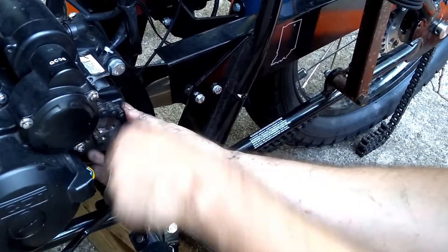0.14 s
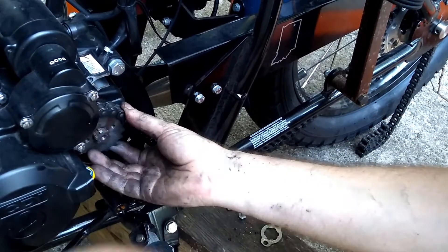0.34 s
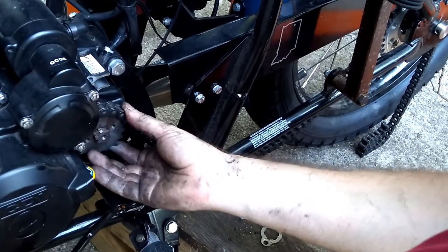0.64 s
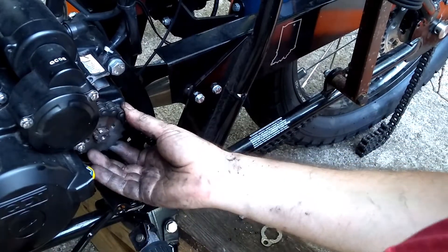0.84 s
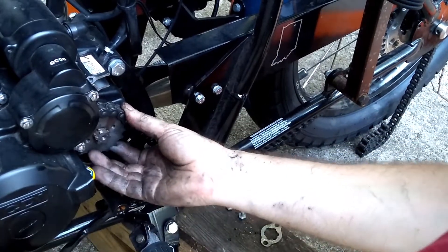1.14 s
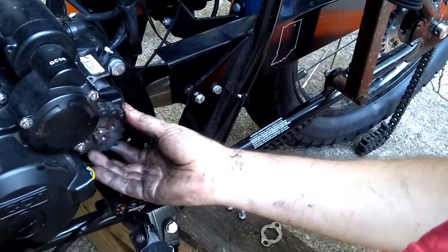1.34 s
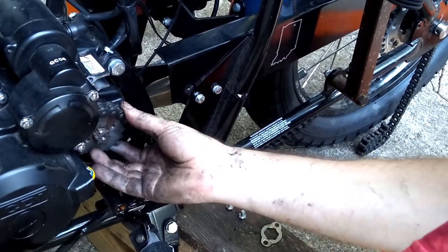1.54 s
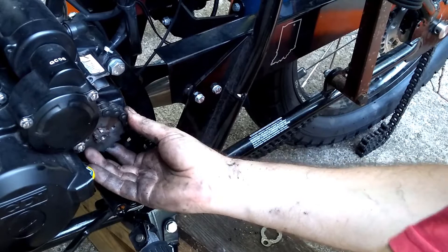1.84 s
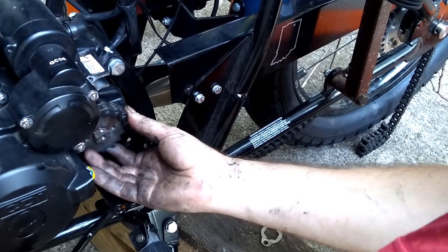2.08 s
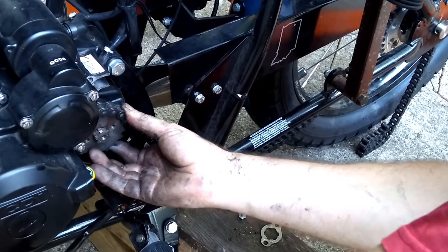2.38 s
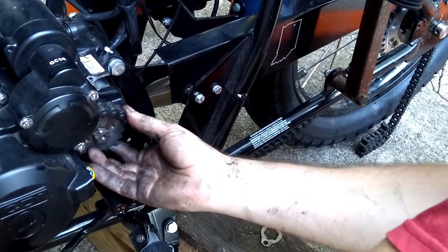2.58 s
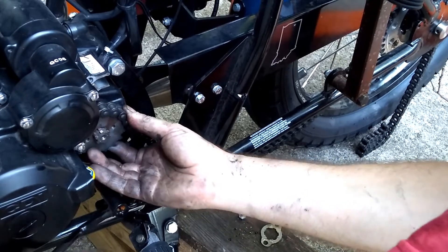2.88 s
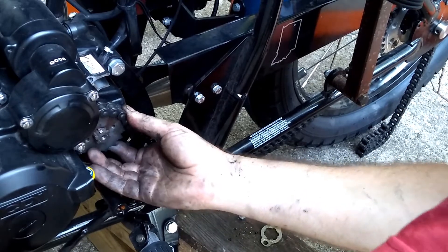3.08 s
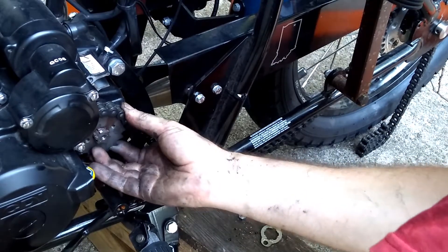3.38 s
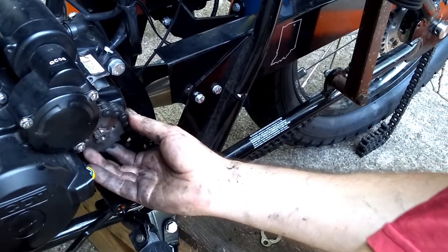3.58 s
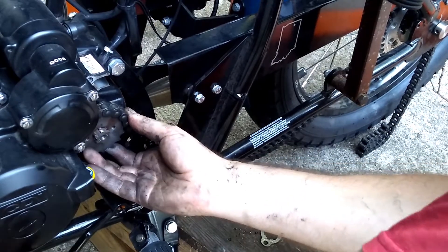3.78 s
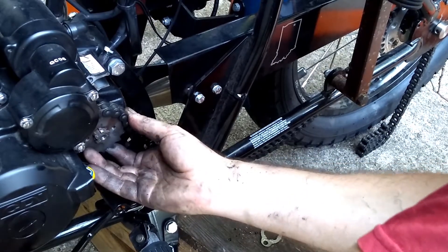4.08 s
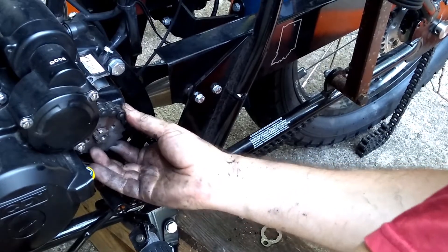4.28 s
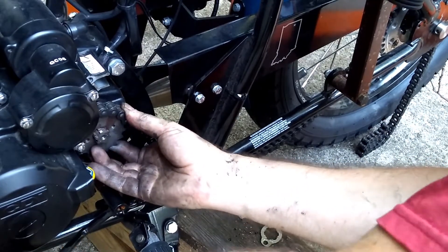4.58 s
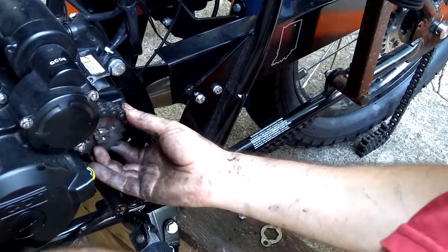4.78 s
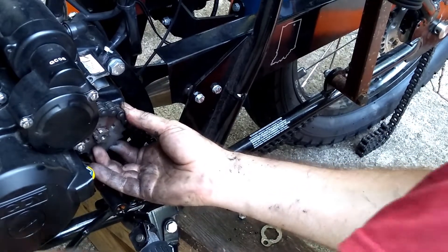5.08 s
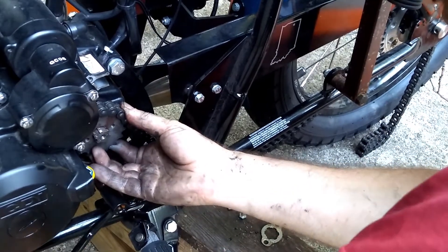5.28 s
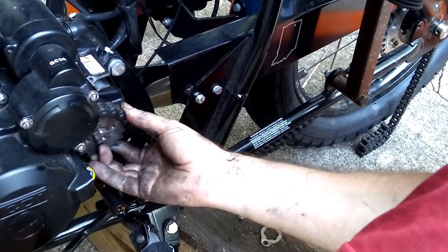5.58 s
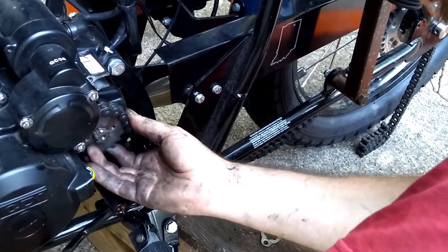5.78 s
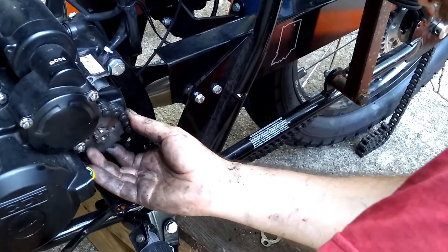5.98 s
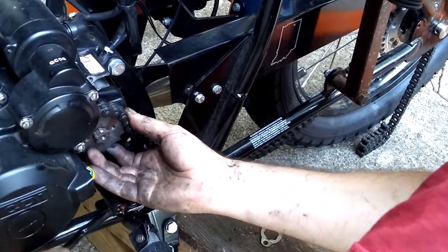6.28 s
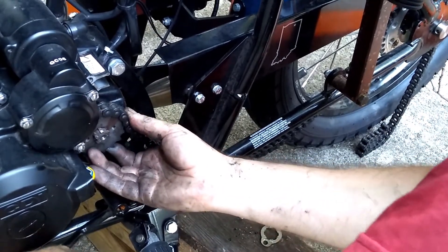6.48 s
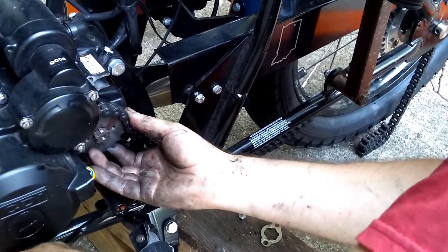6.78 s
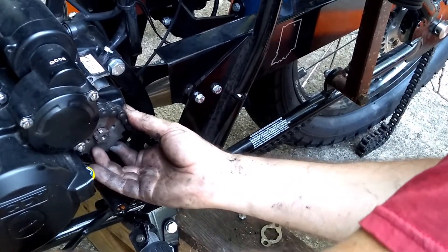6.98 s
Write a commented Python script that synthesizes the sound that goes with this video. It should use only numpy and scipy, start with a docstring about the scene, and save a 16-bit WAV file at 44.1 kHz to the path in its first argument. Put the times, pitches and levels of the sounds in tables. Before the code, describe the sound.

A metal drive chain is shifted by hand on its sprocket, close to the microphone in an open garage, in wide stereo. Its links click and rattle in short bursts, each with a thin steel ring and a brief echo. A light click comes at about 0.7 seconds, then a sharp cluster of clinks at 1.3, a smaller rattle at 2 and another strong one at 2.8. Lighter ticks follow between 3 and 4 seconds. The busiest stretch runs from 4.7 to 5.2 seconds, with three quick rattles, the last the loudest. After a few faint ticks, one more cluster lands around 6.6 seconds. Underneath, a distant motor hum and low rumble swell and drop out unevenly, steadier and a little stronger after 5 seconds. From about 0.7 seconds, crickets trill faintly outside over soft air noise.

```python
"""A drive chain, shifted by hand on its sprocket, close to a stereo microphone in an open garage.
Links click and rattle in short showers that ring the steel and knock the frame; the sprocket's rim
rings on and the walls answer briefly. In the distance a motor hums over a rumble; this low end rises
and drops out as the recorder's noise suppressor opens and closes. Outside, crickets trill with their
wings over faint air noise. The camera widens its stereo picture."""
import sys
import numpy as np
from scipy import signal
from scipy.fft import rfft, irfft, next_fast_len
from scipy.io import wavfile
from scipy.ndimage import uniform_filter1d

SR = 44100
rng = np.random.default_rng(int(sys.argv[2]) if len(sys.argv) > 2 else 0)


def persist_wave(psi):
    """Save psi, clipped to +-1, as 16-bit WAV."""
    counts = np.round(np.clip(psi, -1, 1) * 32767).astype(np.int16)
    wavfile.write(sys.argv[1], SR, np.atleast_2d(counts).T)


N = 314433

# chain blows: t/s, peak in the 2.4-5 kHz band/dB, rattle length/ms, then four tone gains:
# frame knock/dB, hollow/dB, sprocket clank/dB, bright tick/dB
CHAIN_BLOWS = [(0.665, -40.5, 2.9, -17.5, -24, -11, -20.5), (0.673, -46.5, 3.2, -21, -36, -1, -39),
               (0.9778, -57.5, 42, -33, -18, -4, -30), (1.064, -52.5, 2.4, 4.5, -9, -6, -9.5),
               (1.26, -34, 19.4, -31.5, -14.5, -5, -17), (1.2737, -38.5, 25, 1, -0.5, -5, -13),
               (1.289, -24, 1.9, -15.5, -13.5, -3.5, -11), (1.2992, -19, .8, -4.5, -8, 0.5, -16),
               (1.308, -33, 4.9, -0.5, -2.5, 6.5, -16), (1.3958, -42, 0.81, -12, -7, -14, -12),
               (1.625, -51, 7.8, -7.5, 7, -4, -7), (1.971, -31, 13.7, -13.5, -6, -12, -12),
               (2.0451, -38.5, 3, -21, -6, 5, -15), (2.314, -61.5, 25, -21, -31, -1.5, -9),
               (2.7958, -40, 22, -7.5, -11, -1, -16.5), (2.8321, -22, 3.2, 2, -2, 0, -17.5),
               (2.8458, -30, 12.7, 5, 4.5, 4.5, -9), (3.005, -53, 4.2, -39, -25, -23, -39),
               (3.0208, -43.5, 7, -21, -4, -25, -10), (3.1133, -48, 2.9, -11, 6, -2.5, -16.5),
               (3.526, -57, 3, -20, -17, -1, -27), (3.555, -34, 3.6, -11.5, -11, -3, -18.5),
               (3.695, -36, 4.4, -13, -21, -12, -17), (3.9613, -36, 4, -3, -14, -8, -20.5),
               (4.6629, -29, 16, -13, -10, -1.5, -11.5), (4.6842, -28, 2, -27, -8, -1.5, -9),
               (4.6901, -24, 4.7, -3.5, 0.5, -1.5, -10.5), (4.698, -39.5, 25.7, 4.5, 6, 4, -15),
               (4.865, -33.5, 4.4, -18.5, -15.5, -5.5, -24.5), (4.885, -34.5, 15, -9.5, -4.5, 2.5, -12),
               (4.909, -37, 11, -7, -7.5, 3, -7.5), (4.926, -35, 20, -0.5, -3.5, -1.5, -2),
               (4.9454, -48, 5, 7, -6, -1.5, -5), (5.166, -19.5, 8.4, -4, -3.5, -0.5, -16.5),
               (5.1793, -17, 1.7, -1, 7, 2.5, -15.5), (5.1916, -35, 4.1, 7, 9, 8, -21.5),
               (5.416, -53.5, 25, -24, -26, -4, -20), (5.516, -58, 6, 12.5, -12, -5, -26.5),
               (5.7591, -48, 23.6, -5, -21, -3, -27), (6.526, -62.5, 21, -12.5, -21, -20, -14),
               (6.5958, -44, 19, 5, 3, 5, -20), (6.6126, -28, 10.4, -3, -12, -0.5, -14),
               (6.627, -29.5, 9.8, -8, 0, 6, -9.5), (6.6748, -41, 2.8, -7, 1, -5, -17),
               (6.957, -55, 26, -14.5, -19, -15, -14.5)]
# where a blow's tone is set (knock, hollow, clank, two points at unity gain, tick): f/Hz
TONE_POINTS_HZ = [560, 950, 1500, 2500, 4200, 6200]
# modes of links, sprocket and frame, damped by grease and hand: f/Hz, level/dB, t60/s
STEEL_MODES = [(266, 10, 0.026), (491.6, -4.5, 0.062), (550.6, 0, 0.054), (731.7, -4, 0.034),
               (929, -5, 0.045), (1135, -11, 0.03), (1308, -8, 0.041), (1540, -4.5, 0.052),
               (1835, -3, 0.023), (2830, -6.5, 0.016), (2998, -0.5, 0.025), (3365, -5, 0.03),
               (3783, 0.5, 0.017), (6500, 11.5, 0.007), (8450, -2, 0.036)]
# resonance of the sprocket's free rim: f/Hz, level/dB, t60/s
RIM_MODES = [(3800, -8, .5)]
# reverberation of the garage: f/Hz, t60/s
GARAGE_DECAY = [(250, 0.42), (600, 0.3), (1400, 0.29), (3700, 0.27), (9000, 0.24)]
# upper hum harmonics as the noise suppressor lets them through, relative to the low end:
# t/s, third/dB, fourth/dB, fifth and sixth/dB
SUPPRESSED_HARMONICS = [(0.0, -4, -11.5, -35.5), (1.3, -24, -63, -45), (2.04, 0, -9, -19.5),
                        (2.45, -3.5, -17.5, -35), (2.8, 2.5, 8, -9), (3.28, -39.5, -31, -43),
                        (3.47, -12, -2, -22), (3.97, 0, 2, -17), (4.52, -13, -13.5, -41),
                        (5.22, -4, -3, -3.5), (5.7, -7.5, -9.5, -17.5), (6.0, -19, -38.5, -36),
                        (6.52, -18, -26, -63), (6.64, -4.5, -9, -32), (7.12, -8, -16.5, -38)]
# spectrum of the distant rumble: f/Hz, relative level/dB
RUMBLE_SPECTRUM = [(25, -35), (56, -34), (80, -9), (157, -7), (285, -22.5), (600, -46), (1300, -75.5)]
# level of the low end as the recorder's noise suppressor opens and closes: t/s, level/dB
SUPPRESSOR_LEVEL = [(0.0, -64.5), (0.44, -57), (0.72, -43.5), (1.14, -50), (1.33, -41.5), (1.5, -57),
                    (1.75, -53), (2.0, -50), (2.35, -52), (2.66, -58.5), (2.85, -48), (3.3, -54),
                    (3.95, -56.5), (4.08, -69.5), (4.33, -53), (4.47, -65.5), (4.7, -45.5), (5.2, -48.5),
                    (5.78, -41), (7.12, -44)]
# brief dropouts of the low end where the suppressor closes: t/s, depth/dB
SUPPRESSOR_DIPS = [(1.901, -12), (2.73, -15.5), (3.1, -12), (3.41, -10.5), (4.201, -19), (4.559, -8),
                   (4.821, -14), (5.108, -15)]
# crickets outside: t/s, near level/dB, far level/dB, top hiss level/dB
CRICKET_LEVELS = [(0, -107, -102, -100), (.5, -95, -86, -93), (.68, -69, -75.5, -77.5),
                  (2.4, -68.5, -76, -77.5), (2.7, -81, -75.5, -102), (4.5, -74, -77.5, -90.5),
                  (7.13, -72, -70.5, -92)]
# spectrum of the air around the microphone: f/Hz, relative level/dB
AIR_SPECTRUM = [(30, -19.5), (120, 3), (400, -3), (900, -10.5), (2000, -14.5), (4500, -16.5), (9000, -21),
                (16000, -28)]

CONTACTS_PER_S, UNEVEN_DB, FIRST_CONTACT_DB, FALL_DB_PER_MS = 4000, 3, 11.5, 1.14
CLATTER_UNITY_DB, CLATTER_DB_PER_DB = -45, 0.7032  # harder blows clatter more
JINGLE_DB, JINGLE_T60_S = -23, 0.2  # loose links shiver on after each blow
WANDER_RAD = 0.06  # per sample: rubbing links shake the phase of every mode
RIGHT_LAG_RAD = 1.204  # the right microphone hears the links a little behind
HUM_HZ, DIP_S = 79.7, 0.053
CROSS_DELAY_MS, BAND_LIMIT_HZ = 0.4417, 15700


def chain():
    """The hand shifts the chain blow by blow, close by and a little right of centre."""
    lead = 256  # samples of each blow ahead of its moment
    out = np.zeros((2, N + 20000))
    for at_s, peak_db, rattle_ms, *tone_db in CHAIN_BLOWS:
        sound = blow(peak_db, rattle_ms, *tone_db, lead=lead)
        start = round(at_s * SR) - lead
        out[:, start:start + sound.shape[1]] += sound
    return out[:, :N] * gain_of([[-1.2], [1.2]])


def blow(peak_db, rattle_ms, knock_db, hollow_db, clank_db, tick_db, lead):
    """One shower of link contacts rings the steel of chain, sprocket and frame."""
    size = 8192
    t, hz = np.arange(size) / SR, np.fft.rfftfreq(size, 1 / SR)
    shower = rfft(link_contacts(t, rattle_ms))
    steel = rfft(steel_ring(t, hz, shower) + clatter(t, peak_db))
    tone_db = [knock_db, hollow_db, clank_db, 0, 0, tick_db]
    tone = gain_of(at_frequency(list(zip(TONE_POINTS_HZ, tone_db)), hz))
    tone *= (hz / 220) ** 2 / (1 + (hz / 220) ** 2)  # small parts radiate no bass
    tone /= 1 + (hz / 8800) ** 5  # grease takes the top
    lag = np.exp(-1j * np.array([[0], [RIGHT_LAG_RAD]]))
    sound = np.roll(irfft(shower * lag * steel * tone), lead, axis=1)
    core = irfft(rfft(sound) * (hz > 2400) * (hz < 5000))
    core_peak = np.sqrt(2 * uniform_filter1d((core ** 2).mean(0), size=300).max())
    return sound / core_peak * gain_of(peak_db)


def link_contacts(t, rattle_ms):
    """Links strike at random and unequally for the length of the rattle, then die away."""
    size = len(t)
    contacts = rng.standard_normal((3, size)) * (rng.random(size) < CONTACTS_PER_S / SR)
    contacts *= gain_of(UNEVEN_DB * np.minimum(rng.exponential(1, size), 4))
    contacts = 1.2 * contacts[0] + 0.58 * contacts[1:]  # each microphone faces other sides of the links
    attack = np.minimum((t + 1 / SR) / 0.0013, 1)
    contacts *= attack * gain_of(-FALL_DB_PER_MS * np.maximum(1000 * t - rattle_ms, 0))
    contacts[:, 32] += gain_of(FIRST_CONTACT_DB)
    return contacts


def steel_ring(t, hz, shower):
    """The damped steel modes, their level and pitch a little different at every blow."""
    mode_hz, db, t60 = np.transpose(STEEL_MODES)[:, :, None]
    level_luck, pitch_luck = rng.standard_normal((2, len(STEEL_MODES), 1))
    mode_hz = mode_hz * (1 + 0.016 * pitch_luck)
    power = uniform_filter1d(abs(shower.sum(0)) ** 2, size=15)
    reach = np.sqrt(power.mean() / np.interp(mode_hz, hz, power))  # every shower reaches every mode
    wander = WANDER_RAD * np.cumsum(rng.standard_normal((len(STEEL_MODES), len(t))), 1)
    decay = gain_of(db + 2.5 * level_luck - 60 * t / t60)
    build = 1 - np.exp(-t * mode_hz)  # takes a few cycles, so the bass blooms late
    return (reach * build * decay * np.sin(2 * np.pi * mode_hz * t + wander)).sum(0)


def clatter(t, peak_db):
    """Small modes too close to tell apart: a bright burst with a faint jingling tail."""
    bright = signal.lfilter([1, -0.7], 1, rng.standard_normal(len(t)))
    decay = gain_of(-60 * t / 0.02) + gain_of(JINGLE_DB - 60 * t / JINGLE_T60_S)
    return bright * decay * gain_of(CLATTER_DB_PER_DB * (peak_db - CLATTER_UNITY_DB))


def sprocket_rim(links):
    """The free rim rings on thinly after each blow."""
    out = 0
    for hz, db, t60 in RIM_MODES:
        b, a = signal.iirpeak(hz, Q=hz * t60 * np.pi / np.log(1000), fs=SR)
        out = out + gain_of(db) * signal.lfilter(b, a, links)
    return out


def garage(links):
    """Wall reflections: three diffuse tails alternate, so no single pitch rings after every blow."""
    length, out = SR // 2, 0
    for k in range(3):
        taps = np.zeros((2, length))
        arrivals = np.arange(200, length - 20, 20)
        arrivals = arrivals + rng.integers(0, 20, (2, len(arrivals)))
        np.put_along_axis(taps, arrivals, rng.choice([-1., 1.], arrivals.shape), 1)
        hz, t, bands = signal.stft(taps, SR, nperseg=256)
        bands *= gain_of(-60 * t / at_frequency(GARAGE_DECAY, hz)[:, None])
        tail = signal.istft(bands, SR, nperseg=256)[1]
        turn = np.sqrt(2 / 3) * np.cos(2 * np.pi * (11 * np.arange(N) / SR + k / 3))
        out = out + signal.fftconvolve(links * turn, tail / np.linalg.norm(tail[0]), axes=1)[:, :N]
    return out


def motor_hum():
    """A distant, steady hum whose upper harmonics fade in and out under the noise suppression."""
    turns = np.cumsum(HUM_HZ * (1 + 0.002 * drift(hz=13))) / SR
    third, fourth, fifth = gain_curves(SUPPRESSED_HARMONICS)
    levels = [gain_of(-14), gain_of(-2.5), third, fourth, fifth, gain_of(-6.5) * fifth]
    lags_rad = [1.8, 0.36, 1.8, 1.2, 0.87, 0.88]  # between the microphones
    hum = 0
    for k, (level, lag) in enumerate(zip(levels, lags_rad)):
        waver = gain_of((0.2 + 1.1 * k) * drift(hz=26))
        phase = 2 * np.pi * (k + 1) * turns + 0.32 * k * drift(hz=25.75)
        hum = hum + np.sqrt(2) * level * waver * np.sin(phase + lag * np.array([[0.5], [-0.5]]))
    return hum


def low_end():
    """Distant hum and rumble, rising and dropping out at set times as the suppressor opens and closes."""
    hum = motor_hum()
    rumble = gain_of(-3) * stereo_noise(RUMBLE_SPECTRUM, coherence=0.41, patchy_db=1.5)
    flutter = gain_of(2.1 * drift(hz=32) + 0.46 * drift(hz=12))
    drone = flutter * rumble + flutter ** 0.3 * hum  # the hum flutters less
    t = np.arange(N) / SR
    dips = gain_of(sum(db * np.exp(-((t - at_s) / DIP_S) ** 2) for at_s, db in SUPPRESSOR_DIPS))
    return gain_curves(SUPPRESSOR_LEVEL)[0] * dips * drone * gain_of([[-0.8], [0.8]])


def crickets():
    """Outside, wing strokes pulse a narrow chirp; farther ones blur; a thin hiss sits an octave up."""
    strokes = np.cumsum(49 * (1 + 0.013 * drift(hz=1.7))) / SR  # about 49 a second
    gate = (0.38 + np.cos(np.pi * strokes) ** 2) * gain_of(drift(hz=37))
    near, far, hiss = rng.standard_normal((3, 2, N))
    near = unit_rms(gate * resonance(near, 7260, width_hz=59))
    far = unit_rms(resonance(far, 8070, width_hz=180) + resonance(far, 7000, width_hz=730))
    hiss = unit_rms(resonance(hiss, 14900, width_hz=1100) * gain_of(2.5 * drift(hz=30)))
    near_gain, far_gain, hiss_gain = gain_curves(CRICKET_LEVELS)
    return near_gain * near + far_gain * far + hiss_gain * hiss


def air():
    """Faint, diffuse noise all around the microphone."""
    return gain_of(-67) * stereo_noise(AIR_SPECTRUM, coherence=0.15, patchy_db=1.5)


def stereo_noise(spectrum, coherence, patchy_db):
    """Noise of rms 1, partly shared by the microphones, with drifting patches in its spectrum."""
    frames, hz = N // 512 + 5, np.fft.rfftfreq(2048, 1 / SR)
    a, b, c, d, patches = rng.standard_normal((frames, 1025, 5)).T
    patches = unit_rms(uniform_filter1d(uniform_filter1d(patches, size=8, axis=0), size=6, axis=1))
    left = a + 1j * b
    right = coherence * left + np.sqrt(1 - coherence ** 2) * (c + 1j * d)
    bands = np.array([left, right]) * gain_of(at_frequency(spectrum, hz)[:, None] + patchy_db * patches)
    return unit_rms(signal.istft(bands, nperseg=2048, noverlap=1536)[1][:, :N])


def resonance(x, hz, width_hz):
    """A steep resonance: two equal peaks in a row."""
    b, a = signal.iirpeak(hz, hz / width_hz, SR)
    return signal.lfilter(b, a, signal.lfilter(b, a, x))


def drift(hz):
    """A random wander of about unit size, with hz new values a second."""
    steps = rng.standard_normal(4000)
    return np.interp(np.arange(N) / SR * hz, np.arange(len(steps)), steps)


def gain_curves(table):
    """Each dB column of a timed table as a gain per sample."""
    times, *columns = np.transpose(table)
    return [gain_of(np.interp(np.arange(N) / SR, times, db)) for db in columns]


def at_frequency(points, hz):
    """A table's value at hz, interpolated over log frequency."""
    points_hz, values = np.transpose(points)
    return np.interp(np.log(hz + 1), np.log(points_hz + 1), values)


def gain_of(db):
    return 10 ** (np.asarray(db) / 20)


def unit_rms(x):
    return x / np.sqrt(np.mean(x ** 2) + 1e-20)


def scene():
    """At the microphone: the chain close up, the garage around it, motor and crickets beyond."""
    links = chain()
    close = links + sprocket_rim(links)
    return close + air() + gain_of(-11.5) * garage(links) + low_end() + crickets()


def record(dry):
    """The camera widens the stereo: each side subtracts a late copy of the other; then a low-pass."""
    size = next_fast_len(N)
    hz = np.fft.rfftfreq(size, 1 / SR)
    cross_gain = np.interp(hz, [0, 250, 700, 2300, 5000, 7500, SR / 2],
                           [0.44, 0.027, 0.54, 0.7, 0.38, 0.2, 0.062])
    delay = np.exp(-2j * np.pi * hz * CROSS_DELAY_MS / 1000)
    opposite = irfft(rfft(dry[::-1], size) * cross_gain * delay, size)[:, :N]
    lowpass = signal.firwin(511, BAND_LIMIT_HZ, window=("kaiser", 9), fs=SR)
    return signal.oaconvolve(dry - opposite, lowpass[None], "same")


dry = scene()
out = record(dry)
persist_wave(out)
```